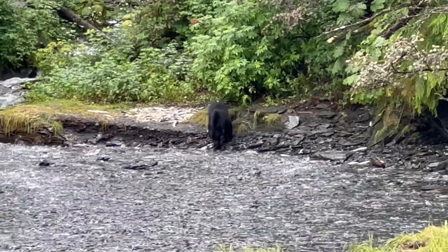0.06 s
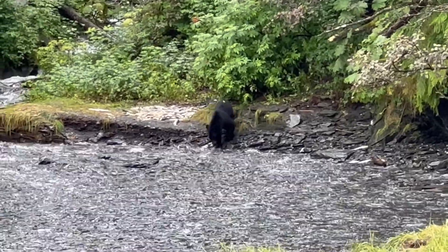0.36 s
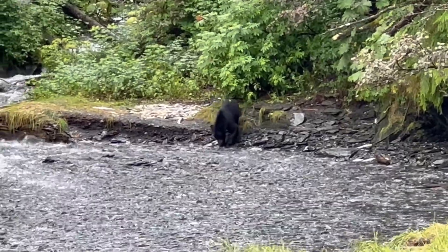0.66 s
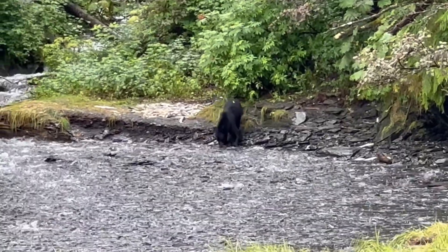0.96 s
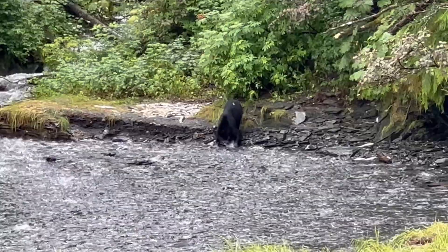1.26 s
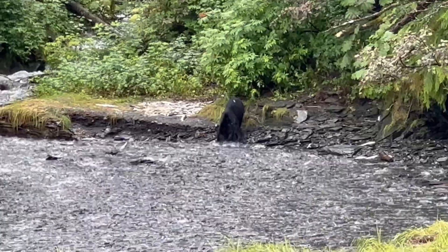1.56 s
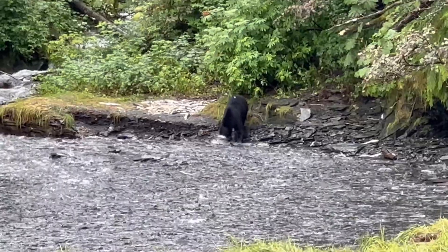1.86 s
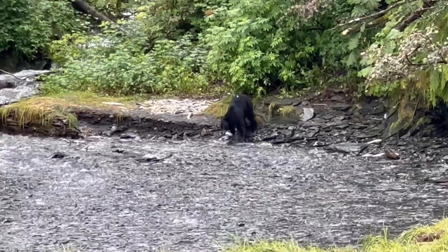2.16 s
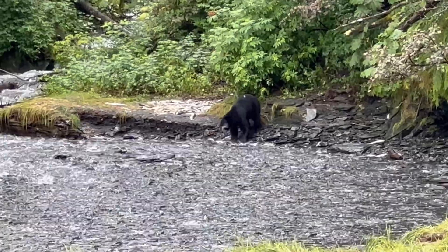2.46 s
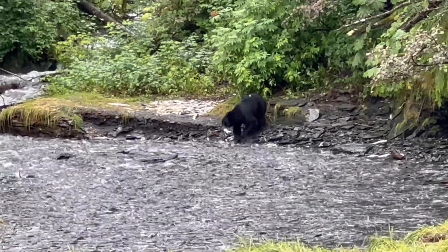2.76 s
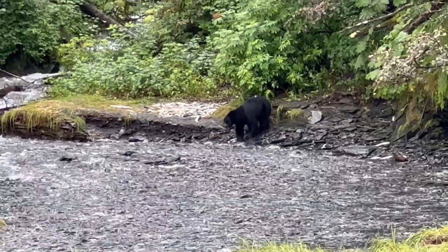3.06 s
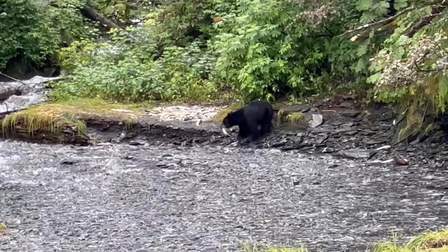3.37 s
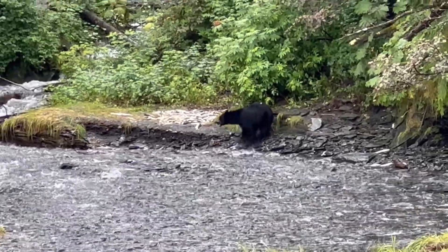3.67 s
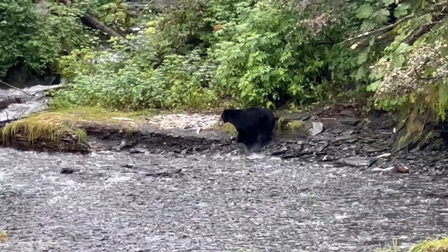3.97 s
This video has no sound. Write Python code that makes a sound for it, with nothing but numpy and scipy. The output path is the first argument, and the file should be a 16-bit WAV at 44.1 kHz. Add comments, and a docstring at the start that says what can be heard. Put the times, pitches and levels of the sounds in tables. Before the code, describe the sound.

A shallow river rushes over stones throughout, heard from the bank, with a faint low hum beneath. From about 0.3 to 0.6 seconds, cloth scrapes close by with tiny squeaks. One soft, deep bump follows near 0.9 seconds, then faint scuffs and crisp ticks come now and then. From around 2 seconds a deeper roar swells under the water, loudest near the end at 4 seconds.

```python
"""A shallow river rushes over stones, heard from the bank: turbulence makes broadband noise, and small
bubbles ring as damped oscillators. A faint low hum lies under the water, with one soft bump.
Close by, something rustles, probably a sleeve: its fibres stick and slip in dense tiny clicks,
making one brief scrape with squeaks, then small scuffs and crisp ticks.
A deeper roar swells through the second half."""
import sys
import numpy as np
from scipy import signal
from scipy.fft import rfft, irfft
from scipy.io import wavfile

SR = 44100
rng = np.random.default_rng(int(sys.argv[2]) if len(sys.argv) > 2 else 0)


def dump_mix(stems):
    """Bounce the given channels to the path in sys.argv[1] as a 16-bit WAV at rate SR."""
    frames = np.atleast_2d(stems).T  # one column per channel
    limited = np.clip(frames, -1, 1)  # hard clip at full scale
    pcm = np.round(limited * 32767).astype(np.int16)
    wavfile.write(sys.argv[1], SR, pcm)


N = 176400
T = np.arange(N) / SR
HZ = np.maximum(np.fft.rfftfreq(N, 1 / SR), 1)


def from_db(db):
    """Amplitude ratio: a factor of ten for every 20 dB."""
    return 10 ** (np.asarray(db) / 20)


def unit_rms(x):
    """Normalisation to unit mean power."""
    return x / np.sqrt(np.mean(x ** 2) + 1e-20)


def in_time(rows):
    """Linear interpolation of each column over time."""
    time_s, *columns = np.transpose(rows)
    return [np.interp(T, time_s, column) for column in columns]


def at_hz(points):
    """Interpolation of a spectrum over log frequency."""
    hz, value = np.transpose(points)
    return np.interp(np.log(HZ), np.log(hz), value)


def drift(corner_hz):
    """Low-passed noise: a slow random fluctuation of unit RMS."""
    step = 40
    pole = np.exp(-2 * np.pi * corner_hz * step / SR)
    noise = rng.standard_normal(N // step + 2002)
    slow = signal.lfilter([1], [1, -2 * pole, pole * pole], noise)[2000:]
    return np.interp(np.arange(N) / step, np.arange(len(slow)), unit_rms(slow))


def resonance(x, hz, width_hz):
    """A two-pole resonator passes a narrow band, with unit gain at its peak."""
    r = np.exp(-np.pi * width_hz / SR)
    feedback = [1, -2 * r * np.cos(2 * np.pi * hz / SR), r * r]
    return signal.lfilter((1 - r * r) / 2 * np.array([1, 0, -1]), feedback, x + 1e-18)


def impulses(per_s, spread_db):
    """Shot noise: independent clicks of random size and sign."""
    sizes = from_db(spread_db * np.minimum(rng.exponential(1, N), 5)) * rng.choice([-1, 1], N)
    return sizes * (rng.random(N) < per_s / SR)


# Stereo balance of rush, roar and friction: frequency_hz, left_minus_right_db
BALANCE = [(170, 0), (370, -2.4), (680, -2), (850, 0), (1130, 7), (1270, 6.8), (1500, .9), (2000, 0)]
# Left-right coherence of rush, rustle and ticks: frequency_hz, coherence_ratio
COHERENCE = [(100, .995), (350, .95), (530, .65), (900, .5), (1200, .62), (1600, .98), (7300, .94),
             (9000, .98)]
# Phase lead of rush, roar, rustle and ticks: frequency_hz, left_lead_rad
LEAD = [(60, .1), (300, .35), (480, 1.05), (830, 2.05), (1100, 1.8), (1330, -.1), (2100, 0), (3400, .65),
        (4600, .45), (5400, 0)]
def stereo(mid, side, spectrum, coherence, lead, sideways=1):
    """Partial coherence gives two noises width; phase and level cues, times sideways, give direction."""
    alike = np.clip(at_hz(coherence), 0, 1)
    pair = np.sqrt(1 + alike) * rfft(mid) + np.sqrt(1 - alike) * rfft(side) * [[1], [-1]]
    halves = sideways * np.array([[.5], [-.5]])
    direction = np.exp(1j * halves * at_hz(lead)) * from_db(halves * at_hz(BALANCE))
    out = irfft(pair * from_db(at_hz(spectrum)) * direction / np.abs(direction.mean(axis=0)), N)
    return out / np.std(out.mean(axis=0))


def turbulence(spectrum, coherence, sideways, flicker_db, flicker_hz):
    """Turbulent noise: each half octave fluctuates independently in level."""
    white, out = rfft(rng.standard_normal((2, N))), 0
    band = np.floor(2 * np.log2(np.maximum(HZ, 64)))
    for k in np.unique(band):
        out = out + irfft(white * (band == k), N) * from_db(flicker_db * drift(flicker_hz))
    return stereo(*out, spectrum, coherence, LEAD, sideways)


# Spectral density of the rushing water: frequency_hz, relative_db
RUSH_SPECTRUM = [(25, -22), (38, -10.5), (65, -4), (130, -2), (200, -10), (350, -14.5), (650, -17),
                 (1200, -19), (2400, -25), (4500, -30.5), (7200, -36), (9200, -36.5), (10700, -63),
                 (16000, -78)]
# Envelope of the rush: time_s, level_db
RUSH_LEVEL = [(0, -35.5), (.8, -34), (1.7, -33), (2.5, -33), (4, -31.5)]
def rush():
    """Turbulent flow over stones radiates steady broadband noise."""
    noise = turbulence(RUSH_SPECTRUM, COHERENCE, sideways=.58, flicker_db=.96, flicker_hz=15.6)
    return from_db(in_time(RUSH_LEVEL)[0]) * noise


def bubbles(level_db=-54, t60_cycles=21):
    """Bubbles in the riffles ring as damped oscillators, each at one of twenty pitches."""
    clicks = impulses(per_s=1000, spread_db=-1)
    pitch_index, out = rng.integers(0, 20, N), 0
    for k, hz in enumerate(np.geomspace(600, 4500, 20)):
        r = from_db(-60 * hz / (t60_cycles * SR))
        w = 2 * np.pi * hz / SR
        kicks = clicks * (pitch_index == k) + 1e-18
        out = out + signal.lfilter([np.sin(w), -np.sin(w)], [1, -2 * r * np.cos(w), r * r], kicks) / w
    return from_db(level_db) * unit_rms(out)


# Partials of the hum, lowest first: pitch_hz
HUM_PITCHES = [61.7, 95.9, 123.2, 278]
# Their envelopes: time_s, first_db, second_db, third_db, fourth_db
HUM_LEVELS = [(0, -38, -47, -36, -56), (.7, -37.5, -46, -37.5, -47), (1.2, -40.5, -43, -43, -51.5),
              (2.4, -51.5, -42.5, -55, -62), (3, -35, -48, -55, -52), (4, -36, -32.5, -50, -58)]
# Modulation of the lowest partial: time_s, depth_ratio
THROB_DEPTH = [(.9, .85), (1.2, 0.064)]
def hum(waver_db=2, wander_hz=1.5, throb_hz=3.8, throb_peak_s=.075):
    """Amplitude and frequency modulation: four low partials waver, and the lowest throbs at first."""
    partials = []
    for hz, db in zip(HUM_PITCHES, in_time(HUM_LEVELS)):
        amplitude = np.sqrt(2) * from_db(db + waver_db * drift(14))
        phase = 2 * np.pi * np.cumsum(hz + wander_hz * drift(7.7)) / SR
        partials.append(amplitude * np.sin(phase))
    throb = 1 + in_time(THROB_DEPTH)[0] * np.cos(2 * np.pi * throb_hz * (T - throb_peak_s))
    return partials[0] * throb + sum(partials[1:])


def stroke(start_s, length_s, level_db, attack_s=.00079, release_s=.0066):
    """Amplitude envelope of one rub: linear rise, hold and exponential decay."""
    rise = np.clip((T - start_s) / attack_s, 0, 1)
    decay = np.exp(-np.clip((T - start_s - length_s) / release_s, 0, 20))
    return from_db(level_db) * rise * decay


SLIPS_PER_S, SLIP_SPREAD_DB = 9000, 2
# Resonances excited by rubbing: pitch_hz, width_hz, boost_db
RUB_MODES = [(2130, 160, 4), (2720, 160, 3.5), (5620, 290, 2), (6750, 310, 2.5), (8830, 120, 3.5)]
def fibre_slips():
    """Stick-slip friction: fibres release in tiny clicks that excite narrow resonances."""
    clicks = impulses(SLIPS_PER_S, SLIP_SPREAD_DB)
    return clicks + sum((from_db(db) - 1) * resonance(clicks, hz, width) for hz, width, db in RUB_MODES)


def friction(power, spectrum, coherence=COHERENCE, lead=LEAD):
    """Friction noise in stereo, its amplitude the square root of its power."""
    return np.sqrt(power) * stereo(fibre_slips(), fibre_slips(), spectrum, coherence, lead)


# Envelope of the faint rustle: time_s, level_db
RUSTLE_LEVEL = [(0, -53), (.33, -64), (.46, -47.5), (.62, -47.5), (.72, -56), (1.1, -53), (1.32, -48),
                (2.25, -50), (2.45, -53.5), (2.65, -46.5), (3, -52.5), (4, -48)]
# Thin scuffs and ticks: start_s, length_s, body_db, top_db
TICKS = [(1.037, .004, -39.5, -52), (1.219, 0.0037, -32.5, -50), (1.28, 0.078, -43.5, -55),
         (1.661, .008, -45, -53), (1.723, .02, -41.5, -51), (1.768, .006, -40, -57), (2.04, .005, -45, -49),
         (2.131, .006, -41, -54), (2.169, 0.0037, -35.5, -48), (2.214, 0.043, -43, -52),
         (2.332, .020, -37.5, -57), (2.55, .006, -37.5, -52), (2.794, 0.018, -39.5, -53),
         (3.163, .007, -37, -51), (3.22, 0.0086, -39, -53), (3.353, .008, -37.5, -52),
         (3.747, .013, -35, -43)]
# Spectral density of the body of rustle and ticks: frequency_hz, relative_db
BODY_SPECTRUM = [(1500, -3), (4700, -5.5), (5600, -1), (6600, -1), (7700, 4), (9200, 3.5), (10000, -8),
                 (10800, -24), (15500, -35)]
# Spectral density of their crisp top: frequency_hz, relative_db
TOP_SPECTRUM = [(7000, -30), (10500, -6), (15500, 4)]
def rustle_and_ticks(flicker_db=2, top_relative_db=-16, top_flicker_db=3):
    """Incoherent sources add in power: brief rubs of cloth stand out over a continuous rustle."""
    rustle = from_db(in_time(RUSTLE_LEVEL)[0] + flicker_db * drift(21))
    rustle_top = rustle * from_db(top_relative_db + top_flicker_db * drift(16))
    body_power = rustle ** 2 + sum(stroke(s, length, db) ** 2 for s, length, db, _ in TICKS)
    top_power = rustle_top ** 2 + sum(stroke(s, length, db) ** 2 for s, length, _, db in TICKS)
    return friction(body_power, BODY_SPECTRUM) + friction(top_power, TOP_SPECTRUM)


# Strokes that catch and ring: start_s, length_s, level_db, pitch_hz
SQUEAKS = [(0.34, .006, -33, 7500), (0.37, 0.011, -39, 2680), (.577, .004, -36.5, 7680),
           (.568, .03, -44, 2600)]
def squeaks(width_hz=120):
    """Forced resonance: the slips of each stroke drive one narrow mode."""
    out = 0
    for start_s, length_s, db, hz in SQUEAKS:
        clicks = impulses(SLIPS_PER_S, SLIP_SPREAD_DB)
        steady_rms = np.std(resonance(clicks, hz, width_hz))
        out = out + resonance(stroke(start_s, length_s, db) * clicks, hz, width_hz) / steady_rms
    return out


# Strokes of the scrape: start_s, length_s, level_db
SCRAPES = [(.348, 0.015, -31.5), (.362, .011, -29.5), (.377, .008, -27), (.392, 0.0054, -26),
           (.408, 0.0033, -34), (.415, 0.0091, -27), (.434, 0.0055, -26), (.443, .008, -33.5),
           (.493, 0.0043, -35.5), (.562, 0.0052, -34.5), (.578, .005, -31.5), (.599, .003, -44),
           (2.716, .004, -39.5)]
# Its spectral density: frequency_hz, relative_db
SCRAPE_SPECTRUM = [(300, -18), (1300, -12), (2000, -3.5), (4200, -4), (6500, -0.5), (7700, -0.5),
                   (9000, 0.5), (10000, -6), (10800, -16.5), (15500, -13)]
# Its left-right coherence: frequency_hz, coherence_ratio
SCRAPE_COHERENCE = [(2000, .97), (6500, .9), (8800, .68)]
# Its phase lead: frequency_hz, left_lead_rad
SCRAPE_LEAD = [(2100, 0), (6500, .35), (8400, 2.1), (10500, .3), (15000, -1)]
def scrape():
    """Sliding friction: quick strokes of cloth give bursts of broadband noise."""
    power = sum(stroke(*row) ** 2 for row in SCRAPES)
    return friction(power, SCRAPE_SPECTRUM, SCRAPE_COHERENCE, SCRAPE_LEAD)


def bump(start_s=.865, pitch_hz=66, level_db=-18.5, t60_s=.13):
    """An exponentially damped sinusoid makes one soft, deep knock."""
    age_s = np.maximum(T - start_s, 0)
    decay = np.exp(-np.log(1000) * age_s / t60_s)
    return from_db(level_db) * decay * np.sin(2 * np.pi * pitch_hz * age_s)


# Spectral densities of the roar's middle and deep ranges: frequency_hz, relative_db
MIDDLE_SPECTRUM = [(250, -10.5), (420, -6), (600, 4), (850, -0.5), (1150, 0.5), (1450, -9.5), (1800, -8),
                   (2600, -19), (4500, -36), (9000, -77)]
DEEP_SPECTRUM = [(25, -12), (40, -27), (70, 1), (120, -2.5), (170, 2.5), (230, -2.5), (330, -6.5),
                 (450, -6), (700, -11), (1500, -61)]
# Their envelopes: time_s, level_db
MIDDLE_LEVEL = [(0, -71), (1.2, -52.5), (1.8, -43), (2.3, -37.5), (2.8, -33.5), (3.3, -31.5), (3.7, -32),
                (4, -30.5)]
DEEP_LEVEL = [(0, -47), (2.2, -57), (2.7, -35), (3.2, -32), (3.8, -26.5), (4, -28)]
# Their left-right coherence: frequency_hz, coherence_ratio
ROAR_COHERENCE = [(100, .995), (250, .97), (400, .9), (1100, .9), (1280, .7), (1700, .98), (3300, .93)]
# Brief surges and lulls: centre_s, gain_db
SURGES = [(3.10, -1.5), (3.23, 1.5), (3.57, -1.5), (3.615, 3)]
def roar(surge_width_s=.014):
    """Turbulent noise swells from the left, its middle range first and its bass later."""
    middle = turbulence(MIDDLE_SPECTRUM, ROAR_COHERENCE, sideways=1, flicker_db=-.05, flicker_hz=5.2)
    deep = turbulence(DEEP_SPECTRUM, ROAR_COHERENCE, sideways=.98, flicker_db=.1, flicker_hz=16)
    swell = from_db(in_time(MIDDLE_LEVEL)[0]) * middle + from_db(in_time(DEEP_LEVEL)[0]) * deep
    surge_db = sum(db * np.exp(-((T - s) / surge_width_s) ** 2) for s, db in SURGES)
    return from_db(surge_db) * swell


def scene():
    """Superposition: the pressures of all sources add."""
    return rush() + bubbles() + hum() + rustle_and_ticks() + squeaks() + scrape() + bump() + roar()


def record(dry, notch_hz=8256, notch_width_hz=340, rim_width_hz=410, low_hz=29, high_hz=15780):
    """Zero-phase filtering cuts a treble notch with a raised rim, the deepest bass and the very top."""
    hz = np.fft.rfftfreq(2 * N, 1 / SR)
    notch_db = -33.5 * np.exp(-((hz - notch_hz) / notch_width_hz) ** 4)
    rim_db = 3.5 * np.exp(-((hz - notch_hz) / rim_width_hz) ** 2)
    low_pass = 1 / np.sqrt(1 + (hz / high_hz) ** 500)
    high_pass = (hz / low_hz) ** 5 / np.sqrt(1 + (hz / low_hz) ** 10)
    fade = np.clip(np.minimum(T, T[-1] - T) / .002, 0, 1)
    return irfft(rfft(dry * fade, 2 * N) * from_db(notch_db + rim_db) * high_pass * low_pass)[:, :N]


dry = scene()
out = record(dry)
dump_mix(out)
```